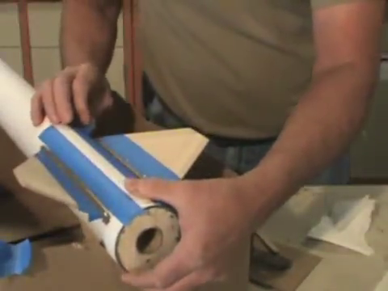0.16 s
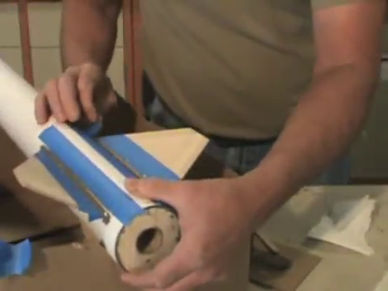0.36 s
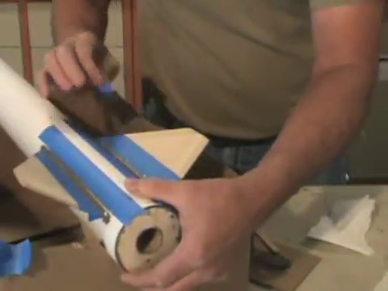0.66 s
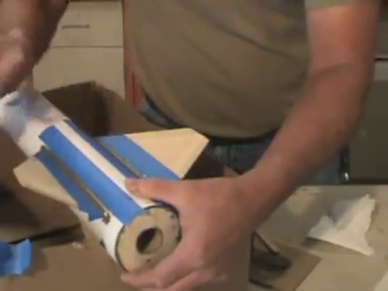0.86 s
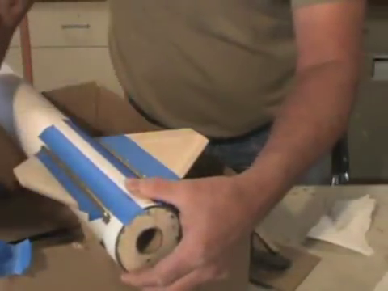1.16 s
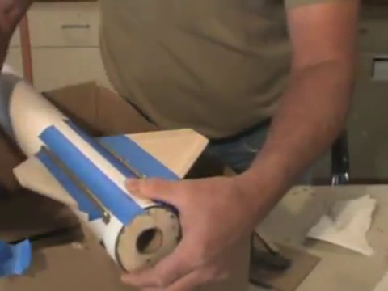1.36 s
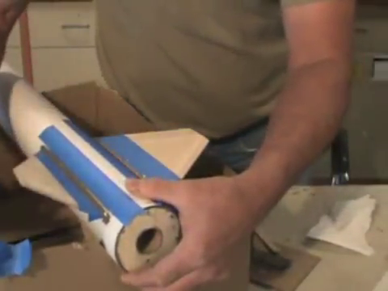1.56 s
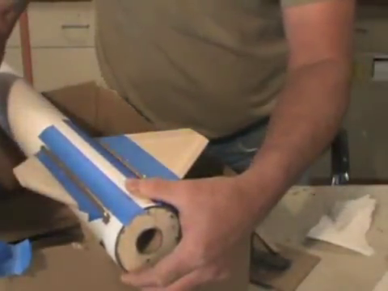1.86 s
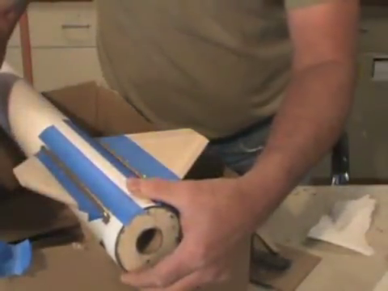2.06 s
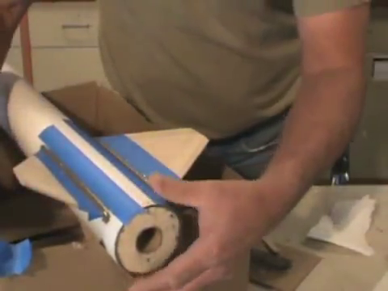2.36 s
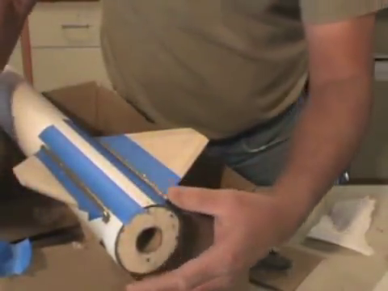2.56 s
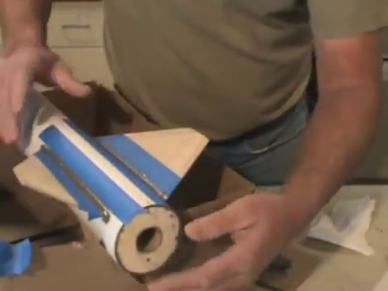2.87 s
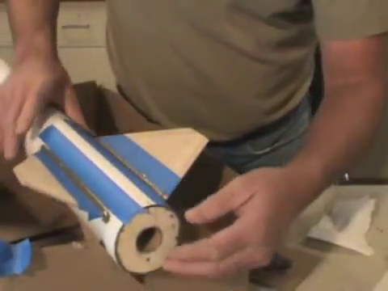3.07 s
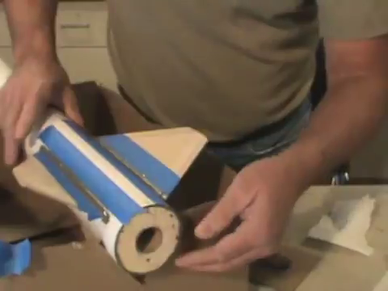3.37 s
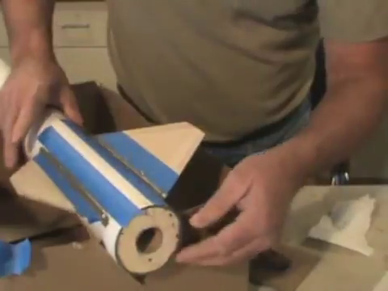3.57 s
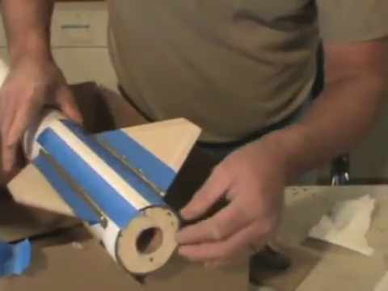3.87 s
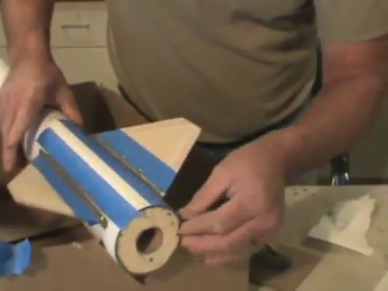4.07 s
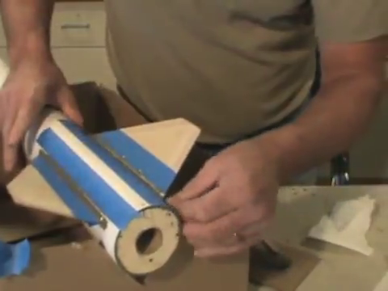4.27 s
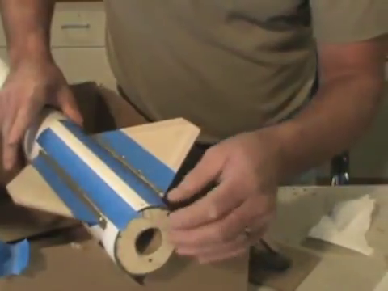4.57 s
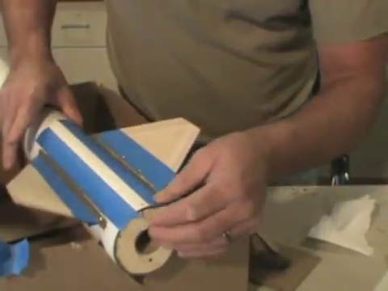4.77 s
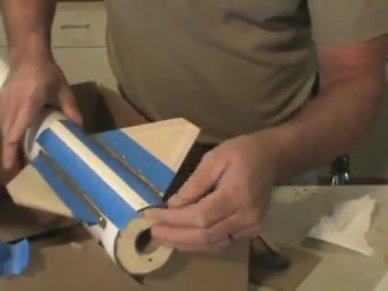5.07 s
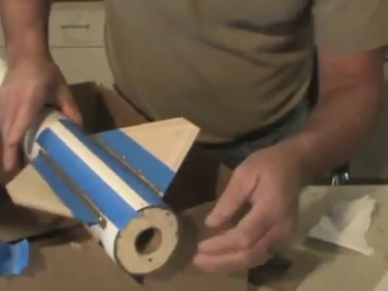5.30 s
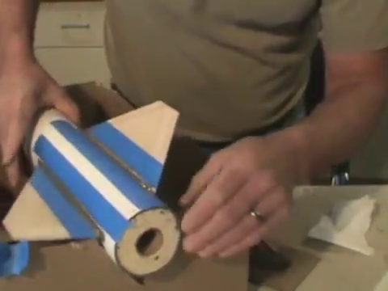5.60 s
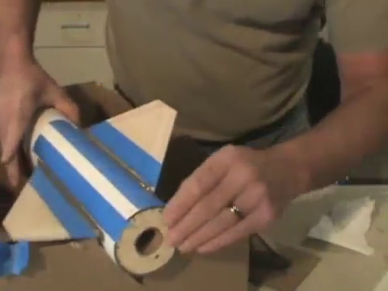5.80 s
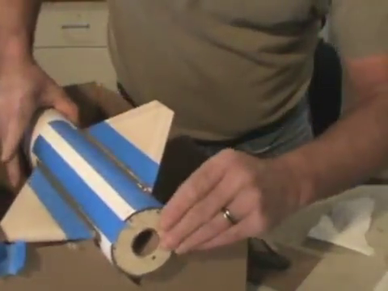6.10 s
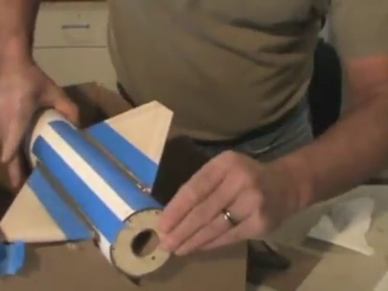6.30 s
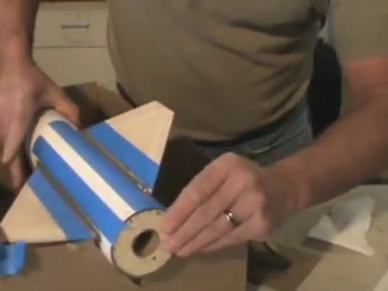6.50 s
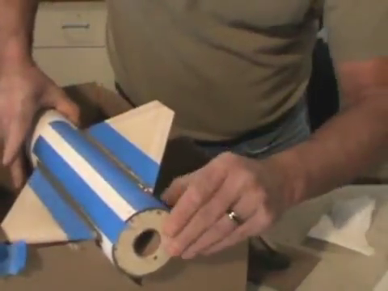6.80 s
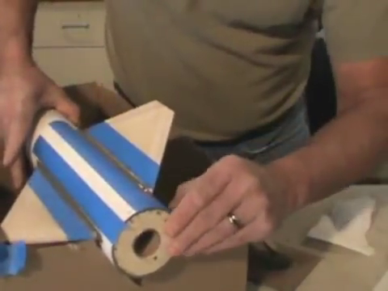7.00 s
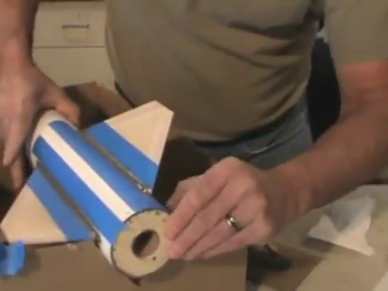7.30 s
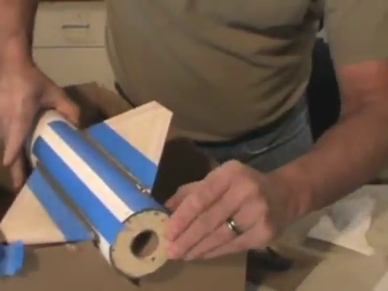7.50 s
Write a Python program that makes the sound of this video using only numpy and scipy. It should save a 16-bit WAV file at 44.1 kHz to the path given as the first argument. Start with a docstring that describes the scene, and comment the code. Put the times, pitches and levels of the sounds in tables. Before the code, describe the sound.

Fingers pick at masking tape on a hollow cardboard tube: sharp bright snaps, papery rustles and dull hollow bumps over faint camera whine and hiss.

```python
"""In a workshop, hands pick and peel masking tape on a hollow finned tube that rests in a cardboard box.
Snaps are decaying noise bursts shaped by tape and wooden fins; strokes are filtered stick-slip noise
over a rumble of the box. Knocks are sums of damped sines, and snaps and knocks excite a diffuse room.
A small camera close by adds the stepped whine of a tiny motor and a thin high tone; air and microphone
hiss lie beneath."""
import sys
import numpy as np
from scipy import signal
from scipy.fft import rfft, irfft, next_fast_len
from scipy.io import wavfile
from scipy.ndimage import uniform_filter1d, map_coordinates

SR = 44100
rng = np.random.default_rng(int(sys.argv[2]) if len(sys.argv) > 2 else 0)


def store_wav(level_fs):
    """Save 16-bit WAV to argv[1]."""
    pcm = np.round(np.clip(np.atleast_2d(level_fs), -1, 1) * 32767)
    wavfile.write(sys.argv[1], SR, pcm.T.astype(np.int16))


N = 337365  # length in samples

# Levels of snaps, knocks, strokes and rumble are those ahead of the slight tilt by BALANCE_DB.
# Spectrum of air and microphone hiss. Each row: frequency in Hz, relative density in dB per Hz.
AIR_SPECTRUM = [(15, -17), (50, 0.5), (120, -1), (470, -6.5), (900, -10), (1500, -10), (3400, -12.5),
                (6500, -16.5), (9000, -16), (12000, -21), (16000, -13.5)]
# Left-right coherence of that hiss. Each row: frequency in Hz, correlation from -1 to 1.
AIR_COHERENCE = [(60, 0.98), (130, 0.93), (290, 0.35), (640, 0.02), (1410, 0.077), (3100, 0.037),
                 (6820, 0.17), (15000, 1)]
# Left-right coherence of rubbing and echo. Each row: frequency in Hz, correlation from -1 to 1.
NEAR_COHERENCE = [(60, .96), (250, .94), (700, .8), (2500, .77), (5000, .9), (15000, .95)]
# Reverberation of the workshop. Each row: frequency in Hz, time to fall 60 dB in seconds.
ROOM_DECAY = [(200, 0.37), (2000, 0.38), (10000, 0.082)]
# Motor steps, usual and slower pattern; pitch and levels are means that vary from step to step.
# Each row: start in ticks, pitch in Hz, fundamental in dB, octave in dB.
RUNNING_STEPS = [(0, 3730, -66, -57.5), (.55, 4020, -59.5, -59), (1.0, 3829, -64, -72),
                 (1.25, 3772, -63, -57), (1.6, 4020, -61.5, -76), (1.9, 3775, -61, -54.5),
                 (2.55, 4037, -64, -60), (2.9, 3775, -62.5, -56), (3.55, 4010, -61, -63)]
HUNTING_STEPS = [(0, 4270, -62, -58), (.3, 4800, -62.5, -85), (.48, 4020, -59, -70),
                 (.82, 3752, -63, -56.5), (1.5, 3754, -70, -81), (1.85, 4280, -82, -55.5)]
# Modes of tube and box. Each row: frequency in Hz, relative level in dB, unstretched 60 dB decay in seconds.
BODY_MODES = [(221.6, -1, 0.052), (287.8, 0.5, 0.065), (313.3, -2, 0.077), (367, -4, 0.055),
              (496, -7, 0.042), (613, 3.5, 0.014), (976, -7, 0.01), (1887, -18, 0.041)]
# Modes of the wooden fins. Each row: frequency in Hz, width in Hz, relative level in dB.
FIN_MODES = [(705, 223, -3), (1097, 222, 0.5), (1600, 274, -3), (2132, 330, -4), (2940, 520, -10)]
# Broad ring of the tape. Each row: frequency in Hz, width in Hz, relative level in dB.
SHEET_MODES = [(4220, 2160, -1.5), (10200, 5000, 0)]
# Spectrum of the tape's hiss. Each row: frequency in Hz, relative density in dB per Hz.
TAPE_SPECTRUM = [(2500, -30), (3500, -6.5), (5000, -3.5), (7000, -3.5), (9500, 0), (11000, -0.5),
                 (12500, -4.5), (14000, -16.5), (16000, -1.5)]
# The tube bumping the box. Each row: start in seconds, peak in dB, upper modes against the lowest in dB,
# factor on the decay times, bench thud in dB on the scale of the mode levels.
KNOCK_EVENTS = [(0.543, -36, -3.5, 2.2, -10), (1.315, -40.5, -5, 1.5, -22), (1.359, -33.5, -6, 1.1, -29),
                (1.41, -36.5, 0, 2.4, -8), (1.455, -28.5, -9.5, 3.1, -18), (1.763, -29, -4.5, 1.43, -16),
                (1.891, -35.5, -7, 4.3, -7), (2.062, -28, -10, 1.74, -18), (2.16, -40.5, -8, 2.1, -10),
                (2.203, -31.5, -9.5, 3.2, -27), (2.309, -42, 1.5, 0.71, -16), (2.413, -41.5, 8, 1.7, -16),
                (2.512, -40, -4.5, 1.46, -32), (3.154, -45, 4, 1.2, -18), (3.207, -43.5, 8, 1.1, -14),
                (3.917, -45, 12, 3.2, -12), (4.035, -41.5, 10, 1.66, -14), (4.093, -41.5, 2, 1.9, -21),
                (4.304, -22, -5, 1, -43), (4.362, -37, 0, 1.5, -12), (5.455, -39.5, -2, 1.1, 3),
                (5.494, -40, 2, 1.2, -8), (5.617, -41.5, 8, 1.8, -14), (5.647, -57, -11, 1.2, -14),
                (5.812, -45, -15, 0.99, -16), (5.891, -32.5, -2, 1.4, -22), (5.992, -38.5, 10, 1, -22),
                (6.13, -31, 5, 1.43, -3), (6.276, -38.5, 11, 0.92, 2.5), (6.556, -26, -2, 2.04, -12),
                (6.687, -40, 10, 1.2, -14), (6.746, -42.5, 6, 1.5, -25), (6.794, -36.5, 11, 2.9, -11),
                (6.97, -41, -0.5, 6.9, -15), (7.039, -29, 2.5, 1.8, -6.5), (7.118, -40.5, -4, 1, -5),
                (7.197, -42, 5, 1.4, -8), (7.217, -35.5, 3, 0.86, -16), (7.34, -37.5, 16, 0.81, -2),
                (7.396, -39.5, 12, 1.1, -9), (7.459, -41.5, -5, 3.9, -20), (7.484, -39, 3, 0.97, -12),
                (7.598, -24.5, 5.5, 1.8, -4)]
# The tube shifting in the box, interpolated. Each row: time in seconds, base rumble level in dB.
DRAG_LEVEL = [(0.0, -68.5), (0.49, -61), (1.13, -79), (1.49, -53), (2.34, -51), (2.6, -76), (2.96, -83),
              (3.56, -54.5), (3.8, -64), (4.2, -51.5), (4.45, -65.5), (5.16, -66), (5.6, -51.5),
              (5.84, -59), (6.01, -50), (6.45, -64.5), (6.73, -51), (7.2, -48), (7.39, -61), (7.65, -40)]
# Strokes of fingers and tape over tube and fins. Each row: start in seconds, swell in seconds,
# hold in seconds, tape hiss in dB, card scrape in dB.
STROKE_EVENTS = [(0, .002, 0.15, -60, -71), (0.244, 0.029, 0.093, -57, -66),
                 (0.384, 0.025, .03, -54.5, -68), (1.285, .002, .01, -52.5, -64),
                 (1.3, 0.11, .01, -54, -59), (1.351, .002, .002, -50.5, -59),
                 (1.447, 0.0036, 0.0089, -43.5, -48.5), (1.474, 0.03, 0.19, -60, -62),
                 (1.579, 0.0017, .002, -54.5, -55.5), (1.746, 0.018, 0.029, -47.5, -52),
                 (1.845, 0.027, 0.09, -59, -57.5), (2.042, 0.034, 0.042, -56, -65),
                 (2.163, 0.052, 0.14, -48, -53), (2.367, 0.039, 0.014, -41, -51.5),
                 (2.497, 0.0087, 0.016, -52, -48), (3.103, .32, .03, -60, -68),
                 (3.41, 0.074, 0.12, -62, -62), (3.468, .04, .03, -54, -63),
                 (3.628, 0.048, .03, -59, -56.5), (3.761, 0.025, 0.078, -53, -61),
                 (3.802, .13, .01, -48, -54.5), (3.985, 0.048, 0.035, -53, -55.5),
                 (4.07, 0.026, 0.11, -59.5, -59), (4.167, .05, 0.069, -47.5, -57),
                 (4.292, 0.011, .002, -39, -43), (4.308, 0.011, 0.04, -56, -71),
                 (4.354, 0.0053, 0.047, -42.5, -51), (5.274, 0.18, 0.18, -49, -49.5),
                 (5.687, 0.075, .03, -59, -59), (6.03, .002, 0.027, -48, -57.5),
                 (6.08, 0.021, 0.31, -61, -64.5), (6.478, 0.028, .002, -59, -69),
                 (6.559, 0.0021, 0.033, -51, -51), (6.668, 0.032, 0.011, -46.5, -55),
                 (6.774, .002, 0.029, -39, -46.5), (6.842, 0.039, 0.16, -47, -54),
                 (6.903, 0.15, .006, -43, -45.5), (7.058, 0.017, 0.084, -65, -62.5),
                 (7.23, .04, 0.11, -64, -62.5), (7.112, 0.0044, .003, -43.5, -56),
                 (7.183, .002, 0.014, -44.5, -51.5), (7.453, .002, 0.009, -46, -53),
                 (7.52, 0.037, .002, -48, -60), (7.592, .002, .002, -60, -50)]
# Tape letting go. Each row: start in seconds, peak of the tape part in dB, wooden part against it in dB,
# ring of the free strip in Hz, 60 dB decay of the burst in seconds.
SNAP_EVENTS = [(.0224, -34.5, -30, 10700, .012), (.0907, -48, -20, 7660, .008),
               (0.1212, -27.5, -22, 4650, 0.011), (.175, -38, -18, 7400, 0.011),
               (.286, -33, -17, 9820, .012), (.2926, -28, -16, 9600, 0.0076),
               (.3074, -39, -12, 9270, 0.0096), (.411, -34, -22, 10800, .012),
               (.429, -27.5, -11, 10200, 0.017), (.436, -36, -13, 10300, .012),
               (0.5392, -32, -12, 10300, 0.015), (.5448, -14, -11.5, 9800, 0.013),
               (.548, -11.5, -12, 10000, 0.014), (1.3138, -39.5, -6, 9620, .012),
               (1.4082, -33, -6, 8470, 0.015), (1.6586, -41, -19, 9160, .012),
               (1.761, -43, -4, 9000, 0.0091), (1.8653, -37.5, -8, 9520, 0.017),
               (2.1096, -43, -15, 7600, .012), (2.4146, -34, -14, 9880, 0.011),
               (2.433, -30.5, -5.5, 10280, 0.016), (2.51, -38, 3, 8900, 0.014),
               (2.795, -47, -18, 5920, 0.018), (3.261, -38.5, -17, 9070, 0.0076),
               (3.7757, -41, -8, 7500, .012), (4.0033, -39.5, 0.5, 5350, 0.016),
               (4.2214, -26, -14, 10700, 0.016), (4.857, -51, -0.5, 7530, 0.021),
               (5.732, -39.5, -3, 7700, .012), (5.8905, -7.5, -11.5, 10100, 0.0067),
               (5.93, -31, -13, 9360, .012), (5.9462, -29, -23, 5470, 0.0089),
               (6.189, -36, -17, 9550, 0.0087), (6.2096, -37, -9, 2450, .02),
               (6.338, -37, -6, 9930, 0.0099), (6.409, -37, -21, 9500, 0.0093),
               (6.556, -37, -14, 5500, 0.011), (6.566, -19.5, -29, 9800, 0.017),
               (6.5737, -21, -25, 7600, 0.023), (6.5825, -28.5, -6, 8810, 0.019),
               (6.7126, -31, -23, 10700, 0.016), (7.176, -34, -9, 7500, 0.015),
               (7.2678, -36, -14, 10300, .012), (7.337, -37, -6, 7600, 0.016),
               (7.5443, -36, -17, 11000, .01), (7.5577, -33.5, -13, 9430, .012),
               (7.594, -29, -9, 9000, 0.014), (7.626, -25.5, -5.5, 9300, 0.015),
               (7.6276, -19.5, -12.5, 7200, 0.018)]

TICK_HZ = 59.94  # the camera's picture rate, which clocks the motor
HUNT_START_S, HUNT_END_S = 1.18, 3.27  # span of the motor's slower pattern
SCAN_HZ, SCAN_DB = 15735, -69  # steady thin tone
BAND_LIMIT_HZ = 15900
JOLT_DB = 1.5  # unevenness of the shifting tube
RELEASE_S, FADE_BEND = 0.027, 1.4  # stroke fade: bend 1 is exponential, 2 is a bell
SWELL_BEND = 1.75  # larger gathers later
BASE_HISS_DB, BASE_SCRAPE_DB = -63, -75  # steady low hiss and scrape beneath the strokes
FIZZ_HISS_DB, FIZZ_SCRAPE_DB, FIZZ_T60_S = -32, -55, 0.34  # levels against the snap's peak
RUMBLE_FOLLOW = 0.6  # power of the scrape's ups and downs applied to the rumble
FLUTTER_HISS_DB, FLUTTER_SCRAPE_DB = 1.8, 1.2  # stick-slip depth
BALANCE_DB = [[0.4], [-0.4]]  # left and right gain: close sounds lie slightly to the left


def amp(db):
    """A level in dB is a logarithm of the amplitude ratio."""
    return 10 ** (np.asarray(db) / 20)


def unit(x):
    """Normalisation to a root-mean-square value of 1."""
    return x / np.sqrt(np.mean(x ** 2) + 1e-20)


def peak(x):
    """Normalisation to a peak of 1."""
    return x / np.abs(x).max()


def along(points, hz):
    """Interpolation of (frequency, value) points on a logarithmic frequency axis."""
    f, value = np.transpose(points)
    return np.interp(np.log(hz + 1), np.log(f + 1), value)


def wobble(rate):
    """Smooth random modulation: a spline through rate random knots a second."""
    knots = rng.standard_normal(int(N * rate / SR) + 4)
    return map_coordinates(knots, [np.arange(N) * rate / SR])


def filtered(x, response):
    """Linear filtering: the spectrum is multiplied by a response of frequency."""
    m = next_fast_len(N + SR // 2)  # padded against wrap-around
    spectrum = rfft(x, m) * response(np.fft.rfftfreq(m, 1 / SR))
    return irfft(spectrum, m)[..., :N]


def resonances(modes):
    """Modal superposition: causal band-pass resonances summed with alternating sign."""
    def response(f):
        total = 0
        for k, (centre, width, db) in enumerate(modes):
            damping = 1j * f * width
            total = total + (-1) ** k * amp(db) * damping / (centre * centre - f * f + damping)
        return total
    return response


def spread(pair, coherence):
    """Stereo coherence: the balance of mid and side signals of equal strength sets the correlation."""
    def mid_side(hz):
        angle = np.arccos(np.clip(along(coherence, hz), -1, 1)) / 2
        return np.array([np.cos(angle), np.sin(angle)])
    mid, side = filtered(pair, mid_side)
    return np.array([mid + side, mid - side])


def grit(slips, size_db, smooth):
    """Dry friction: random slips of uneven size, slips per second on average, over smooth noise."""
    hit = rng.random((2, N)) < slips / SR
    size = amp(size_db * rng.uniform(-0.17, 1, (2, N)))
    spikes = hit * size * rng.standard_normal((2, N))
    return unit(unit(spikes) + smooth * rng.standard_normal((2, N)))


def floor():
    """Background noise: air and microphone hiss is random noise of fixed spectrum and drifting level."""
    air = filtered(rng.standard_normal((2, N)), lambda hz: amp(along(AIR_SPECTRUM, hz)))
    drift_db = 0.96 * wobble(1.77)
    return amp(-57.0 + drift_db) * spread(unit(air), AIR_COHERENCE)


def steps(pattern, period):
    """Stepped rotation: pitch and two levels repeat each period of ticks, with scatter at every step."""
    start, pitch, first_db, octave_db = np.transpose(pattern)
    tick = np.arange(N) / SR * TICK_HZ
    k = np.searchsorted(start, tick % period, side="right") - 1
    step_number = (tick // period).astype(int) * len(start) + k
    pitch_chance, level_chance = rng.standard_normal((2, N))[:, step_number]
    return np.array([pitch[k] * (1 + 0.0059 * pitch_chance),
                     first_db[k] + 1.5 * level_chance,
                     octave_db[k] + 2.0 * level_chance])


def motor():
    """Harmonic whine: fundamental and octave hop in time with the picture rate, beside a steady tone."""
    t = np.arange(N) / SR
    hunting = (t > HUNT_START_S) & (t < HUNT_END_S)
    slow_steps = steps(HUNTING_STEPS, period=2)
    usual_steps = steps(RUNNING_STEPS, period=4)
    hz, first_db, octave_db = np.where(hunting, slow_steps, usual_steps)
    # after hunting it trembles around a higher, quieter note for a moment
    late = t - HUNT_END_S
    settle = (late > 0) * np.exp(-(late / 0.17) ** 4)
    tremble = np.sin(2 * np.pi * TICK_HZ * t)
    hz = hz + settle * (4120 + 70 * tremble - hz)
    first_db = first_db + settle * (5 * tremble - 5)
    octave_db = octave_db + settle * (-68 + 6 * tremble - octave_db)
    octave_db = octave_db + 0.83 * hunting * wobble(39.87)
    # an unsteady drive blurs the note slightly
    blurred_hz = hz * (1 + 0.005 * wobble(400))
    phase = 2 * np.pi * np.cumsum(blurred_hz) / SR
    first, octave = uniform_filter1d(amp([first_db, octave_db]), size=60, axis=1)  # softens the hops
    scan = amp(SCAN_DB) * np.sin(2 * np.pi * SCAN_HZ * t)
    return first * np.sin(phase) + octave * np.sin(2 * phase) + scan


def room(x):
    """Diffuse reverberation: noise whose frequency bands die at their own speeds convolves the sound."""
    hz, t, bands = signal.stft(rng.standard_normal((2, SR // 2)), SR, nperseg=256)
    decay = amp(-60 * t / along(ROOM_DECAY, hz)[:, None])
    tail = signal.istft(bands * decay, SR, nperseg=256)[1]
    delayed = np.pad(x, (150, 0))[None]  # samples before the first reflection
    return signal.fftconvolve(delayed, tail / np.linalg.norm(tail[0]), axes=1)[:, :N]


def knocks():
    """Impact excitation: soft bumps ring damped modes at new strengths each time and push the bench."""
    t = np.arange(SR // 4) / SR
    thud = np.sin(2 * np.pi * 145 * t) * amp(-60 * t / 0.099)
    soft_onset = 1 - np.exp(-t / 0.0034)
    upper = np.arange(len(BODY_MODES)) > 0
    out = np.zeros(N + len(t))
    for s, db, upper_db, stretch, thud_db in KNOCK_EVENTS:
        offsets_db = rng.normal(0, 2.3, len(BODY_MODES)) + upper_db * upper
        ring = np.zeros(len(t))
        for (hz, level_db, t60), offset_db in zip(BODY_MODES, offsets_db):
            decay = amp(level_db + offset_db - 60 * t / (t60 * stretch))
            ring += decay * np.sin(2 * np.pi * hz * t)
        bump = peak((ring + amp(thud_db) * thud) * soft_onset)
        out[round(s * SR):][:len(t)] += amp(db) * bump
    return out[:N]


def strokes():
    """Friction envelopes: each stroke swells, holds and fades, and each snap leaves a dying fizz."""
    t = np.arange(N) / SR
    gains = np.ones((2, N)) * amp([[BASE_HISS_DB], [BASE_SCRAPE_DB]])
    for s, swell, hold, hiss_db, scrape_db in STROKE_EVENTS:
        start = round(s * SR)
        u = t[start:][:SR] - s
        swell = max(swell, 1 / SR)
        rise = np.clip(u / swell, 0, 1) ** SWELL_BEND
        since_hold = np.maximum(u - swell - abs(hold), 0)
        fade = np.exp(-(since_hold / RELEASE_S) ** FADE_BEND)
        gains[:, start:][:, :SR] += amp([[hiss_db], [scrape_db]]) * rise * fade
    for s, db, *_ in SNAP_EVENTS:
        start = round(s * SR)
        u = t[start:][:SR // 2] - s
        fizz = amp([[db + FIZZ_HISS_DB], [db + FIZZ_SCRAPE_DB]])
        gains[:, start:][:, :SR // 2] += fizz * amp(-60 * u / FIZZ_T60_S)
    return gains


def rubbing():
    """Stick-slip friction: hiss and scrape share one flutter, while low modes of the box rumble."""
    t = np.arange(N) / SR
    hiss_gain, scrape_gain = strokes()
    pushes = (scrape_gain / uniform_filter1d(scrape_gain, size=SR // 4)) ** RUMBLE_FOLLOW
    flutter = wobble(30)
    hiss = filtered(grit(2500, size_db=9.0, smooth=1.5), lambda hz: amp(along(TAPE_SPECTRUM, hz)))
    fins = resonances(FIN_MODES)
    scrape = filtered(grit(700, size_db=3.5, smooth=1.0), lambda hz: np.abs(fins(hz)) ** 1.01)
    # a mode's width in Hz is inverse to its decay time
    box = [(hz, 2.6 / t60, db) for hz, db, t60 in BODY_MODES[:5]]
    jolts = amp(JOLT_DB * wobble(20))
    rumble = filtered(jolts * grit(300, size_db=4.0, smooth=1.0), resonances(box))
    rumble_gain = amp(np.interp(t, *np.transpose(DRAG_LEVEL))) * pushes
    sound = hiss_gain * amp(FLUTTER_HISS_DB * flutter) * unit(hiss)
    sound += scrape_gain * amp(FLUTTER_SCRAPE_DB * flutter) * unit(scrape)
    sound += rumble_gain * unit(rumble)
    return spread(sound, NEAR_COHERENCE)


def snaps():
    """Sudden release: a dying noise burst sounds bright in the free strip of tape and duller in the wood."""
    t = np.arange(SR // 12) / SR
    hz_grid = np.fft.rfftfreq(len(t), 1 / SR)
    sheet = resonances(SHEET_MODES)(hz_grid)
    fins = resonances(FIN_MODES)(hz_grid)
    out = np.zeros(N + len(t))
    for s, db, body_db, hz, t60 in SNAP_EVENTS:
        envelope = amp(-60 * t / t60) * (1 - np.exp(-8 * t / t60))
        tape_burst, wood_burst = rng.standard_normal((2, len(t))) * envelope
        strip = signal.lfilter(*signal.iirpeak(hz, 2.5, SR), tape_burst) + 0.45 * tape_burst
        bright = irfft(rfft(strip) * sheet, len(t))
        dull = irfft(rfft(wood_burst) * fins, len(t))
        out[round(s * SR):][:len(t)] += amp(db) * (peak(bright) + amp(body_db) * peak(dull))
    return out[:N]


def scene():
    """Superposition: direct sound, echo and rubbing add to the camera's tones and the background."""
    clicks, bumps = snaps(), knocks()
    echo = spread(amp(-9) * room(clicks) + amp(-12.5) * room(bumps), NEAR_COHERENCE)
    close = clicks + bumps + echo + rubbing()
    return close * amp(BALANCE_DB) + motor() + floor()


def record(dry):
    """Band limitation: the camera keeps nothing at or above its band limit."""
    return filtered(dry, lambda hz: hz < BAND_LIMIT_HZ)


dry = scene()
out = record(dry)
store_wav(out)
```